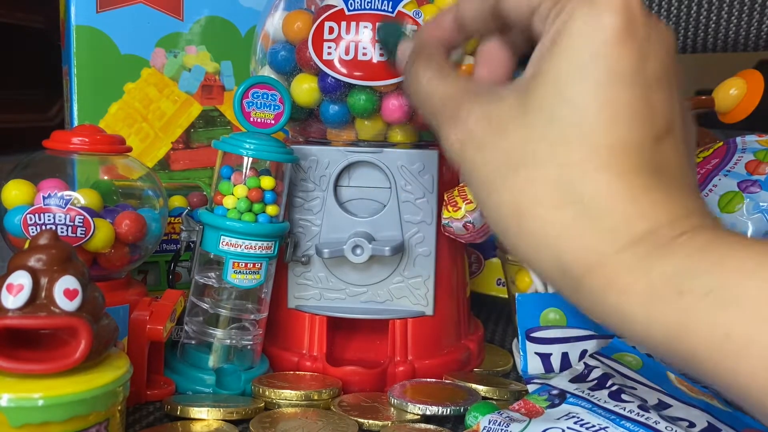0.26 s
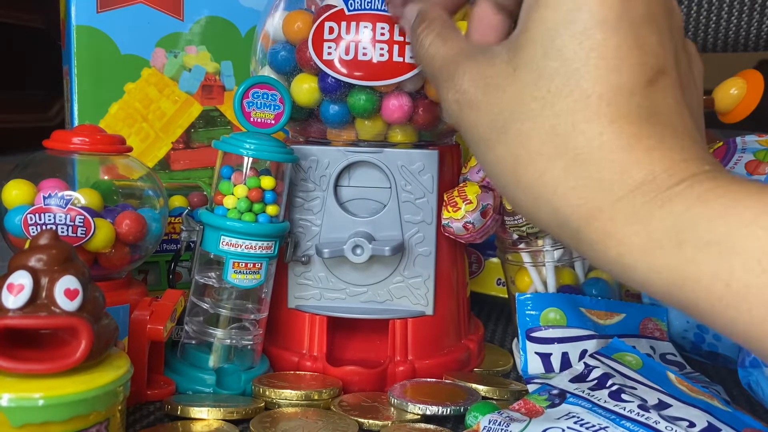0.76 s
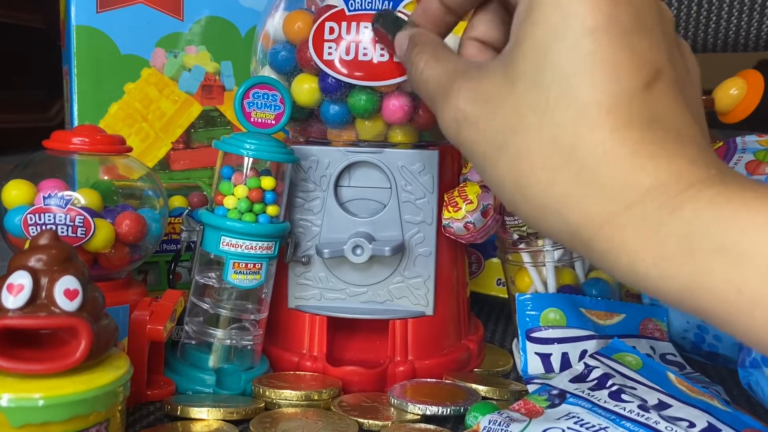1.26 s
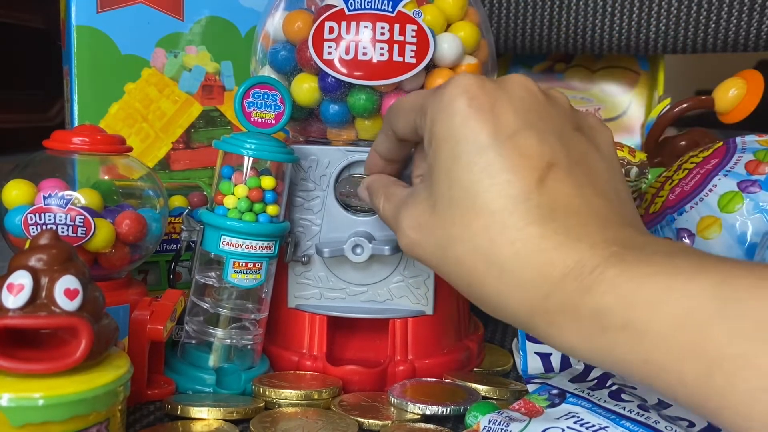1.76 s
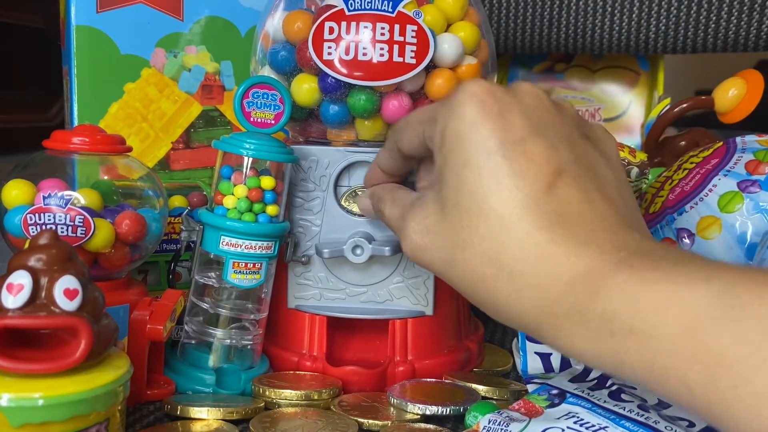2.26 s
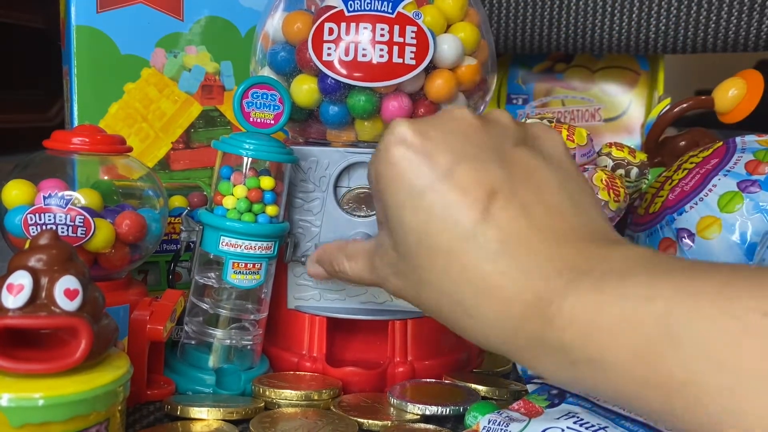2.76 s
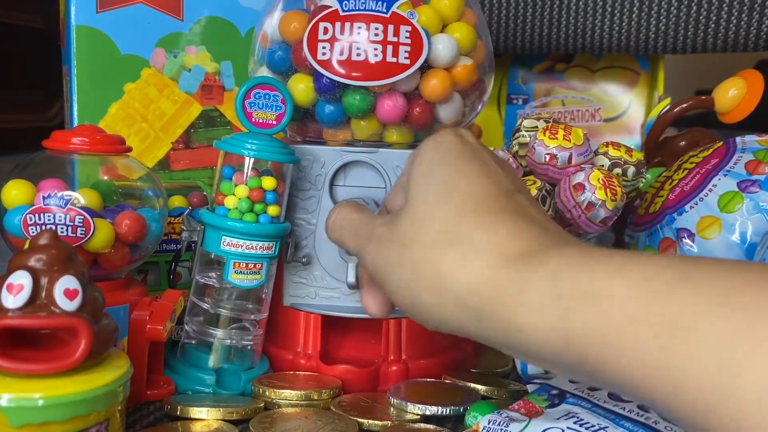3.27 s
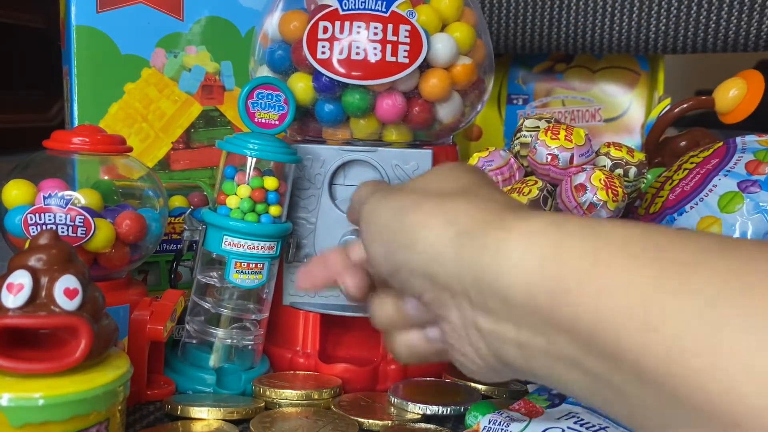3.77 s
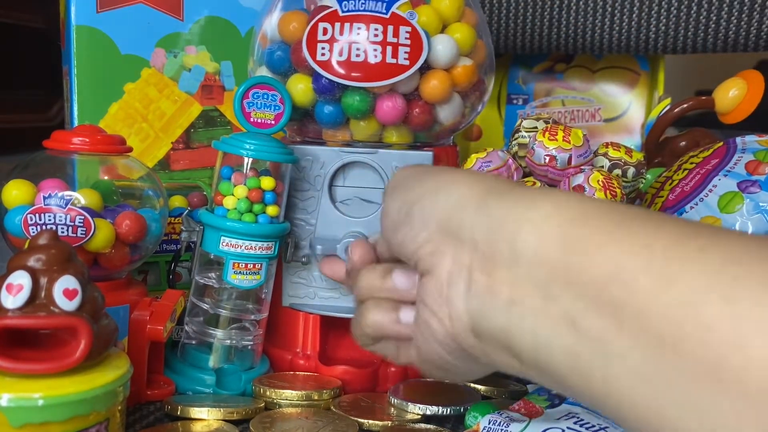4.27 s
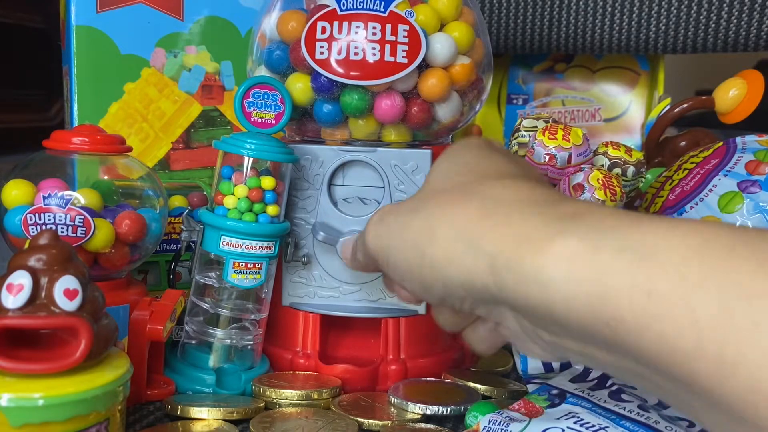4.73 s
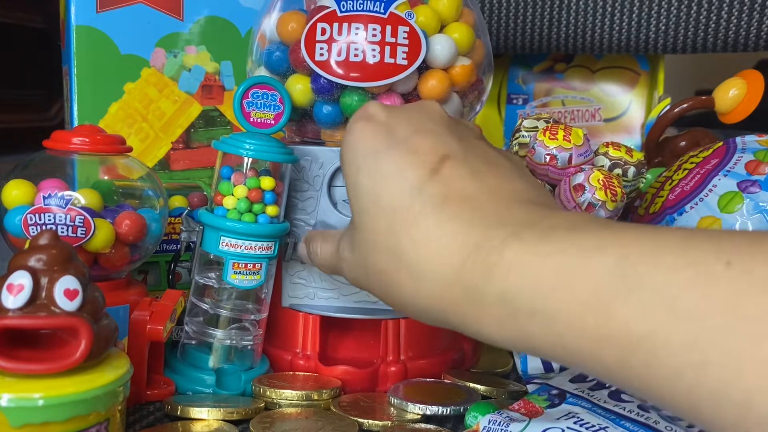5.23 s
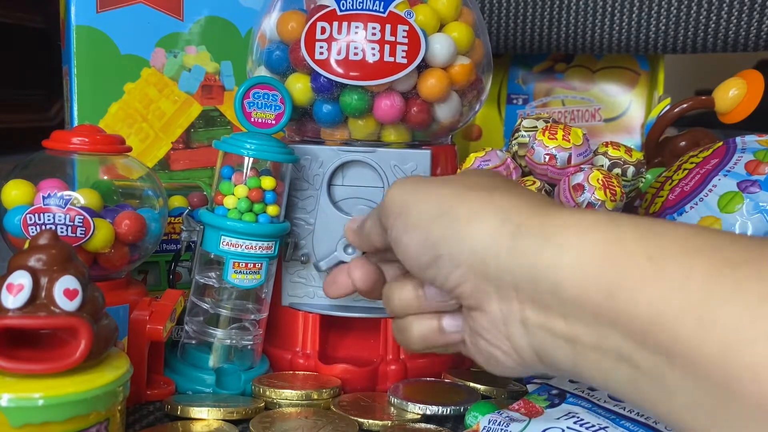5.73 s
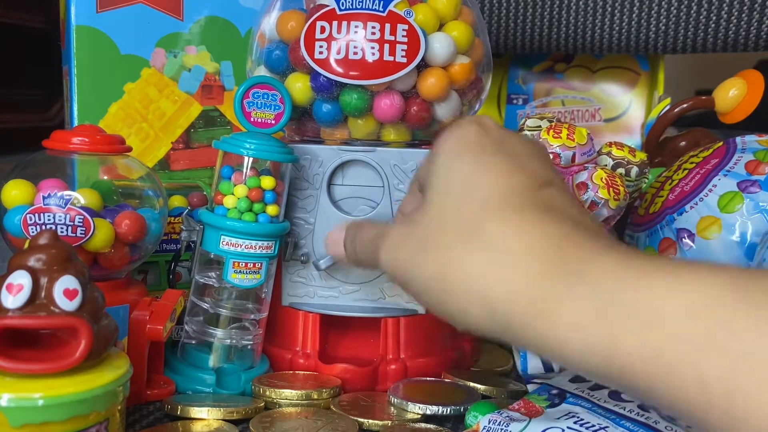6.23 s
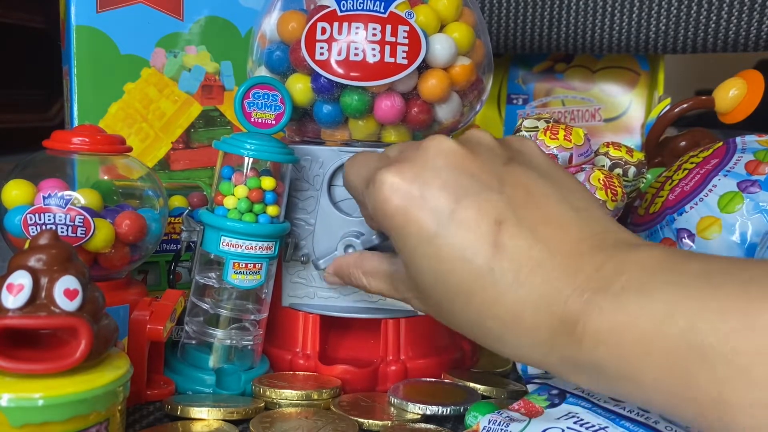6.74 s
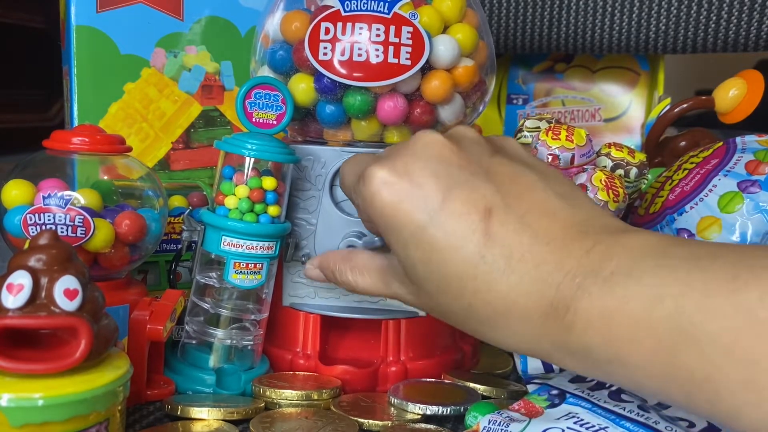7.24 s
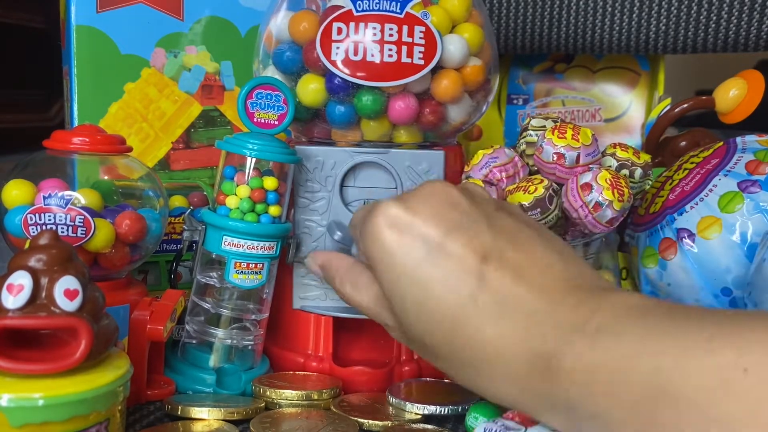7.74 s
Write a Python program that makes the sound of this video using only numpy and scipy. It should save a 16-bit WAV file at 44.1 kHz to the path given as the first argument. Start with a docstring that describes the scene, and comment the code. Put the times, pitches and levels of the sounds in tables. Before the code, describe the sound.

Bright, dry coin taps on thin plastic come first, each short and slightly ringing. Small clicks follow as the coin is fitted into its slot. Then plastic works snap, rattle and rub in uneven clusters, with a light ball hopping down a chute midway. A lull leads to one final strong crunchy burst. Short room echoes and a very faint wash and low hum surround it, with the microphone close.

```python
"""A small plastic candy dispenser on a table in a quiet furnished room, a two-sided microphone close by.
First a coin is tapped on the globe: flurries of contacts shake its resonances, and the coin rings briefly.
Then it is fitted into the slot with small clicks, and the crank is turned in jerks: blows clack and
dense contacts grind in the housing. Soon after 4 s a candy ball drops and bounces in the chute.
Room echoes follow all this; soft shaped noise and a narrow, wavering hum lie below from start to end."""
import sys
import numpy as np
from scipy import signal
from scipy.fft import rfft, irfft, next_fast_len
from scipy.io import wavfile

SR = 44100
rng = np.random.default_rng(int(sys.argv[2]) if len(sys.argv) > 2 else 0)


def field_ratio(decibels):
    """Amplitude ratio for a level in dB (20 dB per decade); scalars and array-likes work."""
    return 10 ** (np.asarray(decibels, dtype=float) / 20)


def wav_out(sig):
    """Save sig, one row per channel (or a flat mono array), as 16-bit PCM at SR to the path in sys.argv[1]."""
    wavfile.write(sys.argv[1], SR, np.round(np.clip(np.atleast_2d(sig).T, -1, 1) * 32767).astype(np.int16))


N = 352800


def rms_one(x):
    """Scales a sound to unit rms."""
    return x / np.sqrt(np.mean(x ** 2) + 1e-20)


def at_hz(points, hz):
    """Reads a spectrum table at a pitch, along a logarithmic scale."""
    table_hz, level = np.transpose(points)
    return np.interp(np.log(hz), np.log(table_hz), level)


def band(x, low_hz, high_hz, order=2):
    """Passes the band between two pitches."""
    edges = [low_hz, min(high_hz, .45 * SR)]
    return signal.sosfilt(signal.butter(order, edges, "band", fs=SR, output="sos"), x + 1e-18)


def resonance(x, hz, width):
    """A damped two-pole mode: white noise of unit power comes out with about unit power."""
    r = np.exp(-np.pi * width / SR)
    gain = np.sqrt((1 - r * r) / 2)
    poles = [1, -2 * r * np.cos(2 * np.pi * hz / SR), r * r]
    return signal.lfilter(gain * np.array([1, 0, -1]), poles, x + 1e-18)


def contacts(shape, per_s, uneven_db):
    """Sparse clicks of random sign and uneven size, unit power."""
    sizes = field_ratio(uneven_db * np.minimum(rng.exponential(1, shape), 4)) * rng.choice([-1, 1], shape)
    return rms_one(sizes * (rng.random(shape) < per_s / SR))


# edges of the four zones of the plastic's sound, lows, middle, highs and top: (frequency [Hz])
ZONES_HZ = [260, 1200, 4000, 8500, 14000]


def body(drive, modes, crack_db, table_db):
    """drive(zone, k) shakes mode k of a plastic shell; a broad crack (k = -1) fills between the modes."""
    hz, width, level_db = np.transpose(modes)
    zones = np.clip(np.digitize(hz, ZONES_HZ) - 1, 0, 3)
    width = np.maximum(width, .04 * (hz + 1000))   # the least width grows with pitch: plastic loss
    power = field_ratio(2 * level_db) * width
    out = np.zeros(N)
    for k in range(len(hz)):
        share = power[k] / power[zones == zones[k]].sum()   # the modes of a zone share unit power
        out += (-1) ** k * np.sqrt(share) * resonance(drive(zones[k], k), hz[k], width[k])
    for zone in range(4):
        low, high = ZONES_HZ[zone], ZONES_HZ[zone + 1]
        turn = (-1) ** zone   # alternate signs let neighbouring zones join without a gap
        to_unit = np.sqrt(SR / 2 / (high - low))
        out += turn * field_ratio(crack_db[zone]) * to_unit * band(drive(zone, -1), low, high)
    table = field_ratio(table_db) * band(drive(0, -1), 57.0, 235.0)   # the table top carries the bass
    return band(out, 310.0, 21000.0, order=3) + table   # a small light box radiates none


def blows(table, modes, crack_db, table_db, level_db, low_db, high_db, top_db, flurry_ms, rise):
    """Each blow is a flurry of contacts that swells for a share (rise) of its length and dies.
    The zones are offset in dB; flurry_ms is the typical length at a strength of -15 dB in the table."""
    s, strength_db, lows_db, highs_db = np.transpose(table)
    luck = rng.standard_normal((len(s), len(modes) + 2))
    # harder blows last longer: 0.36 dB of length per dB of strength
    length_ms = flurry_ms * field_ratio(0.36 * (strength_db + 15) + luck[:, -1])
    samples = np.arange(900)
    phase = samples * 1000 / SR / length_ms[:, None]
    outline = np.minimum(phase / rise, 1) ** 2 * np.exp(-phase ** 2.2)
    flurry = outline * contacts(outline.shape, per_s=10000.0, uneven_db=3.5)
    at = np.minimum((s[:, None] * SR).astype(int) + samples, N - 1)
    zone_db = [lows_db + low_db, 0, highs_db + high_db, highs_db + top_db]
    # whatever its contacts, a flurry puts into each zone the energy of its outline
    even = []
    for low, high in zip(ZONES_HZ, ZONES_HZ[1:]):
        wanted = np.sum(outline ** 2, 1) * (high - low) / (SR / 2)
        even.append(np.sqrt(wanted / np.sum(band(flurry, low, high) ** 2, 1)))

    def drive(zone, k):
        mode_db = 3 * luck[:, k - 1] * (k >= 0)   # every blow finds the modes at new strengths
        gain = even[zone] * field_ratio(strength_db + zone_db[zone] + level_db + mode_db)
        return np.bincount(at.ravel(), (flurry * gain[:, None]).ravel(), N)
    return body(drive, modes, crack_db, table_db)


# resonances of the housing: (frequency [Hz], width before the plastic's least width [Hz], relative level [dB])
HOUSING = [(313, 53, -5), (542, 120, -3), (716, 55, 1), (1010, 750, -10), (1296, 100, 8.5), (2150, 330, 6),
           (2760, 140, -3), (2841, 130, -33.5), (4620, 200, -4), (4680, 220, -2), (5900, 97, -14),
           (6800, 390, 9), (10750, 170, -8.5), (12300, 430, -24)]
# broad crack of the housing, one row a zone: (level beside the modes [dB])
HOUSING_CRACK = [-6, -4, 1, 4]
# blows of the cranked works, close by, before the offsets of blows():
# (time [s], strength in the middle [dB], lows re middle [dB], highs re middle [dB])
CLACKS = [(2.7886, -50, -10, -4), (2.8354, -29.5, -29.5, -7), (2.8464, -21, -4, -2), (2.9891, -53, 15, -19),
          (3.1043, -42, -4, 6), (3.1154, -40, 2, -8), (3.1544, -36.5, 9, -15), (3.1792, -33, 3.5, -21),
          (3.2136, -29.5, 5, -3.5), (3.2304, -39, 3, -8), (3.2625, -21, -6, -16), (3.3672, -34, -17, -20.5),
          (3.5344, -10.5, -2, -2.5), (3.5464, -15, -12.5, -15), (3.5734, -26, 9, -20.5),
          (3.5964, -29, -9, -9), (3.6424, -24, -27, -18), (3.7414, -34.5, -6.5, -13.5),
          (3.7978, -34.5, -11.5, -8), (3.8704, -48, -11.5, -26), (3.923, -51, -9, -27),
          (4.0831, -55.5, 0.5, -35), (4.1614, -11.5, -5.5, -3.5), (4.1804, -17.5, 4.5, -0.5),
          (4.1944, -34.5, -13, -1), (4.2108, -25, 3, -4), (4.2552, -34, -1, -27.5), (4.3221, -35, -2, 4),
          (4.3765, -19, -32, -27), (4.5381, -39.5, -11, -4), (4.5845, -36, 2.5, 4.5),
          (4.9197, -49, -6.5, -7), (5.1133, -54.5, -11, 4), (5.3178, -23.5, -20, -15.5),
          (5.3308, -22, -17.5, -22.5), (5.477, -29.5, -3, -20.5), (5.5454, -13.5, -2, -3.5),
          (5.5634, -24, 4, -26), (5.6054, -29, 3, -9), (5.6146, -25.5, 6, 5.5), (5.6426, -33, -5, 5.5),
          (5.683, -31, -0.5, -7), (5.697, -30, -15, -13), (5.7394, -40.5, 15.5, -33),
          (5.7564, -38.5, 6.5, -35), (5.7768, -32, 2.5, -25), (5.7904, -34, -16, -33.5),
          (5.8346, -34.5, -6, -24), (5.8506, -34, -6, -23.5), (5.8935, -26, -11, -14),
          (5.9194, -42, -6.5, -26), (5.9918, -36, -7.5, -18.5), (6.0856, -56, 19, -19.5),
          (6.1255, -44.5, 1.5, -27), (6.1374, -41.5, 0.5, -27), (6.1674, -47.5, 15.5, -7),
          (6.2178, -40, -7, -3.5), (6.2756, -57.5, -2.5, -2.5), (6.3024, -53.5, -9, 6),
          (6.349, -49.5, -12.5, -5.5), (6.4931, -58.5, -5.5, -29), (6.8974, -66, 7.5, -13),
          (7.0334, -35, -17.5, -5), (7.5954, -28.5, 5.5, -6.5), (7.6056, -18.5, -5, -6),
          (7.6096, -7, -8.5, 0.5), (7.6234, -16, -10, -0.5), (7.6544, -24, -16, -9),
          (7.6764, -17, -16.5, -25), (7.6984, -29, -20, -24), (7.7398, -39, -15, 6),
          (7.7672, -17, -18, -7.5), (7.7982, -11.5, -11.5, -8), (7.8134, -21.5, -15, -13),
          (7.8334, -20.5, -22, -33), (7.9154, -38.5, 4.5, -13), (7.9394, -39, -1.5, -32)]


def crank_clacks(lows, highs):
    """The cranked works strike the housing, with small ticks among the clacks."""
    return blows(np.vstack([CLACKS, ticks(lows, highs)]), HOUSING, HOUSING_CRACK, table_db=-3.5,
                 level_db=-13.0, low_db=11.6, high_db=9.9, top_db=-2.5, flurry_ms=9.12, rise=0.28)


def ticks(lows, highs):
    """Small parts tick at random moments; their level and brightness follow the rubbing then."""
    count = 110   # the faintest are left out below
    at = (rng.random(count) * N).astype(int)
    db = highs[at] + 3 + 3 * rng.standard_normal(count)
    return np.transpose([at / SR, db, lows[at] - highs[at], 0 * db])[db > -90]


# loose parts rub and shift when the hand jerks the works; levels before the zone offsets of grinding():
# (time of peak [s], level of lows [dB], middle and highs re lows [dB], hold [s],
#  time to die by 60 dB, at least 0.03 in use [s])
SLIPS = [(1.596, -48, -11.5, 0.0028, 0.36), (1.862, -54, -16.5, 0.034, 0.48),
         (1.961, -58.5, 9, 0.013, 0.06), (2.238, -48, -19.5, 0.0046, 0.12),
         (2.402, -59.5, -12, 0.0078, 0.54), (2.859, -31, -20, 0.0033, 0.09),
         (3.087, -43, -12.5, 0.092, -1.64), (3.164, -37, -10, .01, -0.4), (3.258, -35.5, -12, 0.014, -0.11),
         (3.33, -56.5, -13.5, .03, .9), (3.519, -41, -12.5, 0.037, 0.32), (3.552, -32, 1.5, 0.058, -0.0438),
         (3.705, -56.5, -14, 0.17, 0.88), (4.189, -30, -7, 0.025, 0.27), (4.277, -44, -13, 0.089, .5),
         (4.494, -47.5, -25, 0.023, 0.12), (4.595, -62, -4, .225, .12), (5.324, -42, -6.5, .025, 0.22),
         (5.407, -53, -9, 0.047, 0), (5.553, -35.5, -7, 0.04, 0.23), (5.617, -27.5, -6.5, 0.023, -0.02),
         (5.69, -42, -15.5, 0.049, 0.34), (5.887, -49.5, -36.5, 0.053, .5),
         (6.129, -63.5, -7.5, 0.24, -0.38), (7.598, -39, -6.5, 0.04, -1.36), (7.657, -26, -13, 0.011, 0.17),
         (7.744, -47, -12, .01, 0.9), (7.812, -28.5, -14, 0.014, -0.16), (7.925, -61.5, -36.5, 0.15, -5)]


def slip_levels():
    """Each slip swells fast, holds and dies at its own pace; the loudest rules. Lows and highs in dB."""
    steps = np.arange(0, N, 64) / SR
    s, db, bright_db, hold, t60 = np.transpose(SLIPS)[:, :, None]
    swell_db = 699 * (s - steps)   # 699 dB per s
    dying_db = 60 * np.maximum(steps - s - hold, 0) / np.maximum(t60, .03)
    lows = db - np.where(steps < s, swell_db, dying_db)
    return [np.interp(np.arange(N) / SR, steps, np.max(x, axis=0)) for x in (lows, lows + bright_db)]


def grinding(lows, highs):
    """Dense small contacts in clumps shake the housing; as they wander, each resonance comes and goes."""
    clumps = field_ratio(2.5 * rms_one(band(rng.standard_normal(N), 9.5, 90, order=1)))
    grains = rms_one(contacts(N, per_s=2500.0, uneven_db=1.0) * clumps)
    zones = [grains * field_ratio(db) for db in (lows - 4, highs - 6, highs - 8, highs - 15)]
    steps = np.arange(0, N + 900, 900)
    wander = field_ratio(4 * rng.standard_normal((len(HOUSING), len(steps))))

    def drive(zone, k):
        return zones[zone] * (np.interp(np.arange(N), steps, wander[k]) if k >= 0 else 1)
    return body(drive, HOUSING, HOUSING_CRACK, table_db=-5.0)


# resonances of the globe: (frequency [Hz], width before the plastic's least width [Hz], relative level [dB])
GLOBE = [(610, 150, -9), (2000, 75, -1), (3100, 33, -3), (3460, 110, -11), (5500, 920, -1),
         (5570, 100, -12), (5850, 170, 2.5), (6480, 230, 1), (7850, 110, -10), (10400, 160, -11),
         (9750, 83, -5.5), (12100, 70, -19.5), (12000, 900, -6), (13500, 500, -15.5)]
# broad crack of the globe, one row a zone: (level beside the modes [dB])
GLOBE_CRACK = [-4, -3, 2, 4]
# taps of the coin on the globe, close by, before the offsets of blows():
# (time [s], strength in the middle [dB], lows re middle [dB], highs re middle [dB])
COIN_TAPS = [(0.0519, -28.5, -13.5, -21), (0.0688, -18.5, -22.5, -2.5), (0.429, -12, -15.5, -1),
             (0.6167, -16.5, -17, -0.5), (0.9812, -12.5, -12, 0.5), (1.1806, -13.5, -20.5, -2)]


def coin_taps():
    """The coin strikes the globe in short flurries and rings itself."""
    globe = blows(COIN_TAPS, GLOBE, GLOBE_CRACK, table_db=-24.0, level_db=-11.0,
                  low_db=5.1, high_db=5.3, top_db=3.0, flurry_ms=6.14, rise=0.07)
    return globe + coin_ring(COIN_TAPS)


# tones of the coin: (frequency [Hz], level among the tones [dB], time to die by 60 dB [s])
COIN = [(2160, 0, .07), (3620, -2, .08), (4600, -14, .06), (5600, -10, .06)]


def coin_ring(taps):
    """Each tap sets the coin ringing briefly between the fingers, as decaying sines."""
    s, db = np.transpose(taps)[:2]
    luck_db = 4 * rng.standard_normal((len(s), len(COIN)))
    out = np.zeros(N)
    for k, (hz, level_db, t60) in enumerate(COIN):
        ring_db = db + level_db - 14 + luck_db[:, k]
        clicks = np.bincount((s * SR).astype(int), field_ratio(ring_db), N)
        r, w = field_ratio(-60 / (t60 * SR)), 2 * np.pi * hz / SR
        out += signal.lfilter([0, np.sin(w)], [1, -2 * r * np.cos(w), r * r], clicks + 1e-18)
    return out


# resonances of the chute: (frequency [Hz], width before the plastic's least width [Hz], relative level [dB])
CHUTE = [(664, 88, -2.5), (1220, 43, -2), (1296, 150, -5.5), (2180, 91, -23), (2630, 820, -6),
         (3530, 67, 4), (5430, 470, -12), (6450, 270, 12), (11000, 2200, -23), (12150, 620, -32)]
# broad crack of the chute, one row a zone: (level beside the modes [dB])
CHUTE_CRACK = [-10, -10, -3, 0]
# landings of the candy ball, before the offset of blows(): (time [s], strength in the middle [dB])
BOUNCES = [(4.2775, -11.5), (4.344, -16), (4.3876, -16.5), (4.4229, -20), (4.4488, -27), (4.467, -26),
           (4.4814, -35), (4.4916, -50), (4.501, -42)]


def ball_bounces():
    """The candy ball hops in the chute; softer landings are duller."""
    s, db = np.transpose(BOUNCES)
    lows_db = np.full(len(s), -4.0)
    highs_db = -9 + 0.83 * (db - db[0])
    return blows(np.transpose([s, db, lows_db, highs_db]), CHUTE, CHUTE_CRACK, table_db=-25.0,
                 level_db=0.0, low_db=-0.5, high_db=1.5, top_db=-9.0, flurry_ms=2.8, rise=0.29)


# the coin is fitted into the slot, before the offsets of blows():
# (time [s], strength in the middle [dB], lows re middle [dB], highs re middle [dB])
SLOT_CLICKS = [(1.5903, -36, -4, -19.5), (1.6044, -27, -23, -27), (1.6877, -46, -7, -24.5),
               (1.7634, -61, 19.5, -27.5), (1.8734, -43.5, -10.5, -24), (1.8844, -52, 7.5, -7.5),
               (1.9134, -34, -5, -7), (1.9469, -21.5, -14, -7), (1.9576, -19, -13.5, -9),
               (2.2365, -55, -4.5, -7.5), (2.2524, -46.5, -6, -14), (2.4064, -39, 2.5, 0.5),
               (2.5553, -56.5, -3, -7)]


def slot_clicks():
    """The coin clicks against the slot and shakes the housing."""
    return blows(SLOT_CLICKS, HOUSING, HOUSING_CRACK, table_db=-17.5, level_db=-7.5,
                 low_db=9.0, high_db=9.5, top_db=-2.5, flurry_ms=9.7, rise=0.336)


# dull knocks through the table: (time [s], level before the short outline [dB], frequency [Hz])
THUMPS = [(3.957, -44, 60.1), (5.55, -32.5, 198), (5.617, -34.5, 161)]


def thumps():
    """The table top swings a few times at a low pitch and dies away."""
    out, t = np.zeros(N + 8000), np.arange(8000) / SR
    outline = (1 - np.exp(-t / 0.0066)) * np.exp(-t / 0.025)
    for s, db, hz in THUMPS:
        out[int(s * SR):][:8000] += field_ratio(db) * np.sin(2 * np.pi * hz * t) * outline
    return out[:N]


def bands():
    """Half-octave bands from 40 Hz up: low edge, high edge, centre."""
    edges = 40 * 2 ** np.arange(0, 9.1, .5)
    return [(low, high, np.sqrt(low * high)) for low, high in zip(edges, edges[1:])]


# how long the furnished room rings: (frequency [Hz], time to die by 60 dB [s])
ROOM_T60 = [(250, .3), (700, 0.23), (2000, 0.2), (5000, 0.27), (8000, .24), (12000, 0.23), (16000, .15)]
# how strongly the room answers: (frequency [Hz], relative level [dB])
ROOM_COLOUR = [(250, -12), (700, -11.5), (2000, -13.5), (5000, -14.5), (8000, -18), (12000, -16.5),
               (16000, -22)]


def room(x):
    """Diffuse echoes, three unrelated sets, build up after a few ms and die band by band."""
    t = np.arange(SR // 2) / SR
    white = rng.standard_normal((2, 3, len(t)))   # neighbouring bands take different noise
    echoes = 0
    for k, (low, high, hz) in enumerate(bands()):
        t60 = at_hz(ROOM_T60, hz)
        decay = field_ratio(at_hz(ROOM_COLOUR, hz) - 60 * t / t60) / np.sqrt(t60 * SR / 14)
        echoes = echoes + decay * band(white[k % 2], low, high)
    build_up = np.clip(t / 0.0027 - .3, 0, 1)
    return signal.fftconvolve(x[None], echoes * build_up, axes=1)[:, :N]


# spectrum of the quiet room: (frequency [Hz], relative density [dB])
ROOM_NOISE = [(18, -38), (30, -19.5), (61, -25.5), (97, -21), (567, -28), (735, -26.5), (905, -28.5),
              (978, -26), (1240, -32.5), (15000, -60)]


def room_wash():
    """Shaped noise makes a soft wash in three unrelated strands."""
    white = rng.standard_normal((2, 3, N))
    wash = 0
    for k, (low, high, hz) in enumerate(bands()):
        wash = wash + field_ratio(at_hz(ROOM_NOISE, hz)) * band(white[k % 2], low, high)
    return field_ratio(-74.5) * wash / np.std(band(wash, 150, 2800))


# course of the hum, midway between the two sides: (time [s], level [dB])
HUM_DB = [(0.0, -60.5), (1.67, -88.5), (2.38, -59.5), (2.76, -84.5), (3.54, -66.5), (4.66, -77), (8.0, -72)]


def room_hum():
    """Noise through two equal narrow resonances hums and wavers; it is louder on the left."""
    hum = rms_one(resonance(resonance(rng.standard_normal(N), 58.0, 12.0), 58.0, 12.0))
    s, db = np.transpose(HUM_DB)
    return field_ratio(np.interp(np.arange(N) / SR, s, db)) * hum * field_ratio([[1.5], [-1.5]])


def ports(x):
    """Two pairs of microphone ports: the right side hears lows early and highs late."""
    low_lag_us, high_lag_us, low_lead_rad = -57.9622, 168.8021, .4
    cross_hz, blend_hz = 5830.0, 407.0
    size = next_fast_len(N)
    hz = np.arange(size // 2 + 1) * SR / size
    upper = 1 / (1 + np.exp(np.clip((cross_hz - hz) / blend_hz, -40, 40)))

    def late(us):
        return np.exp(-2j * np.pi * hz * us / 1e6)
    lower = (1 - upper) * late(low_lag_us) * np.exp(1j * low_lead_rad)
    right = irfft(rfft(x, size) * (lower + upper * late(high_lag_us)), size)[:N]
    return np.array([x, right])


def scene():
    """The dispenser, its table and the room, as they reach the two sides of the microphone."""
    lows, highs = slip_levels()
    machine = crank_clacks(lows, highs) + grinding(lows, highs)
    machine = machine + coin_taps() + ball_bounces() + slot_clicks()
    echoes, wash = room(machine), room_wash()
    shared = machine + thumps() + echoes[0] + wash[0]
    # sound from all round differs at the two sides
    apart = band(field_ratio(2.0) * echoes[1:] + field_ratio(5.0) * wash[1:], 36.0, 6000.0)
    return ports(shared) + apart + room_hum()


# a band of the treble sounds thinned: (frequency [Hz], width [Hz], depth [dB])
TREBLE_DIP = (9100, 860, -12.5)


def thin_treble(dry):
    """A notch mixed with the untouched sound thins a treble band; a low-pass falls off above 14.9 kHz."""
    hz, width, db = TREBLE_DIP
    notched = signal.lfilter(*signal.iirnotch(hz, hz / width, SR), dry)
    dipped = notched + field_ratio(db) * (dry - notched)
    return signal.sosfilt(signal.butter(3, 14900, fs=SR, output="sos"), dipped)


def top_cut(x):
    """Nothing passes above the cut-off."""
    return signal.sosfilt(signal.butter(12, 16650, fs=SR, output="sos"), x)


def record(dry):
    """The treble is thinned, and the highest peaks are barely rounded."""
    top = 1.2
    mix = top * np.tanh(thin_treble(dry) / top)
    return top_cut(mix)


dry = scene()
out = record(dry)
wav_out(out)
```